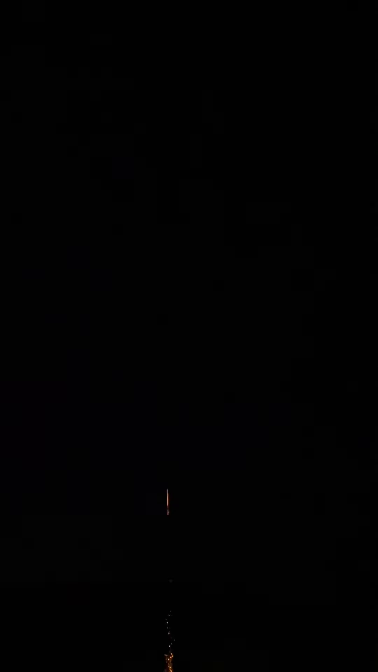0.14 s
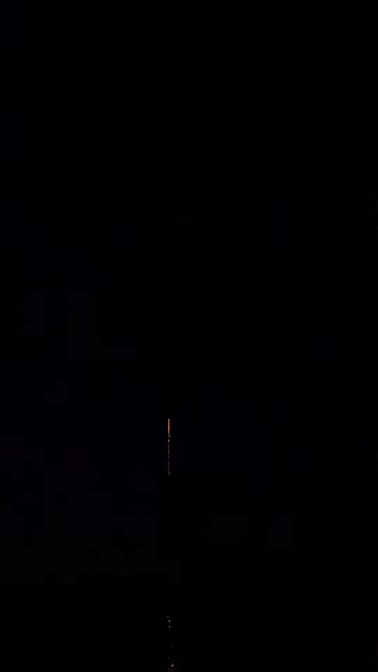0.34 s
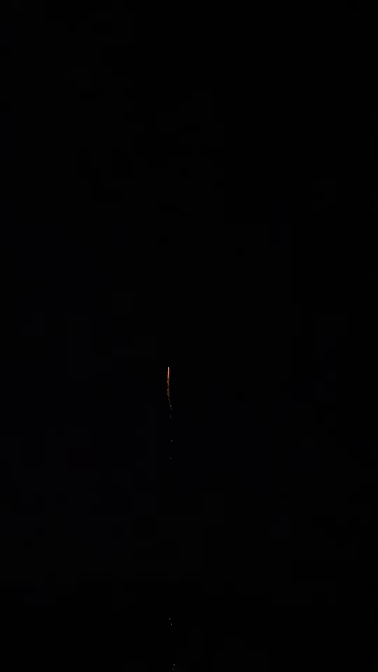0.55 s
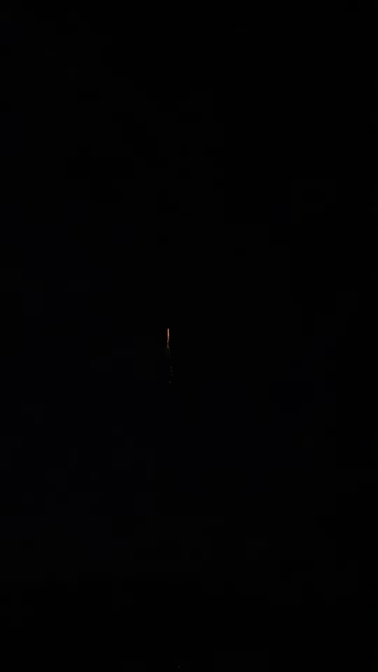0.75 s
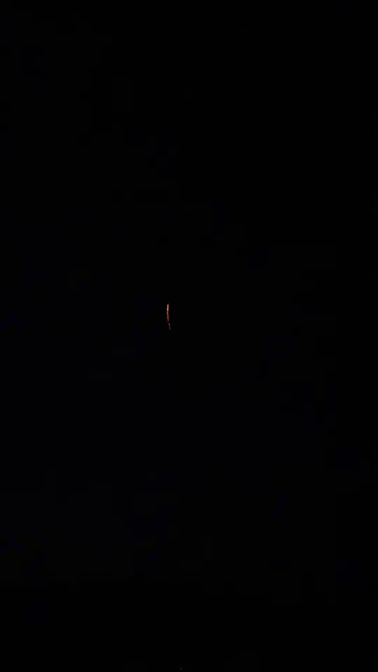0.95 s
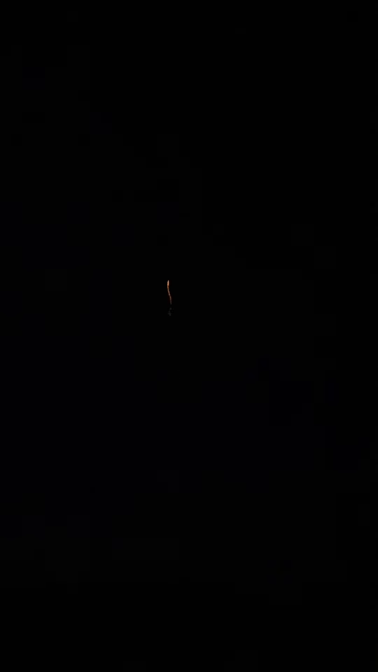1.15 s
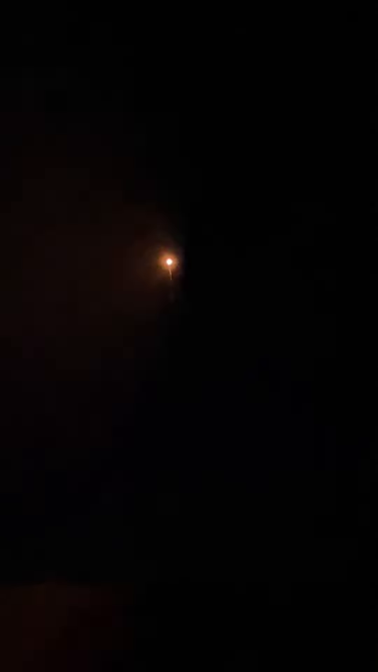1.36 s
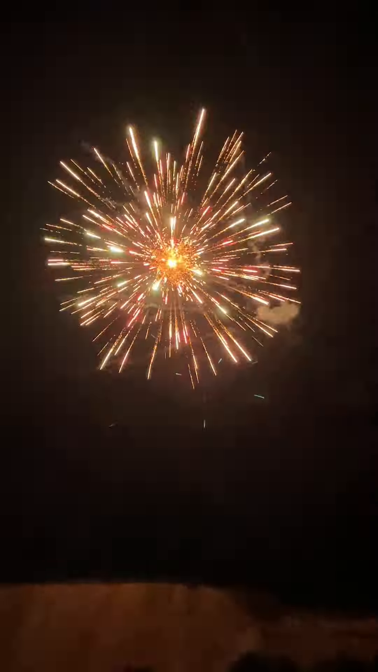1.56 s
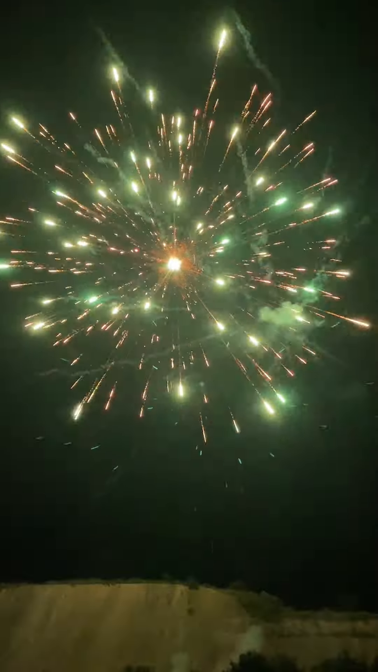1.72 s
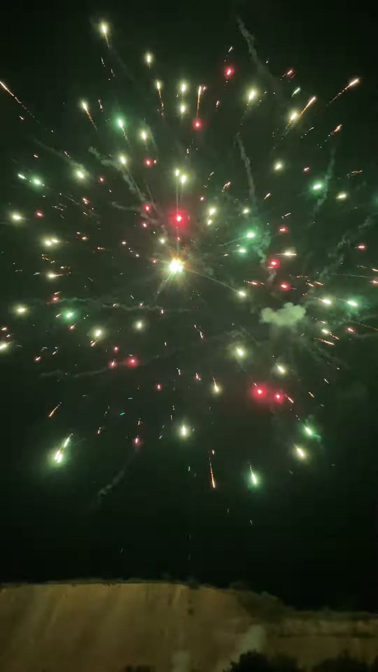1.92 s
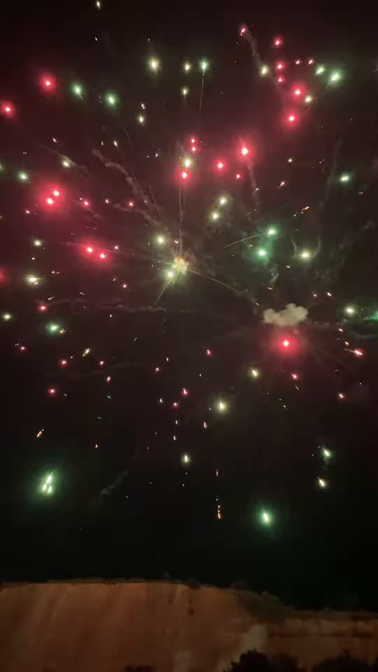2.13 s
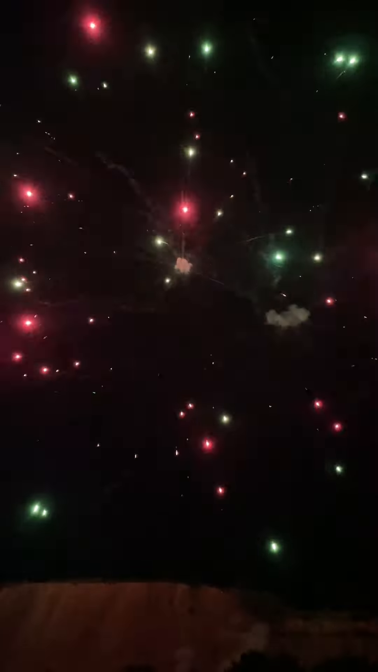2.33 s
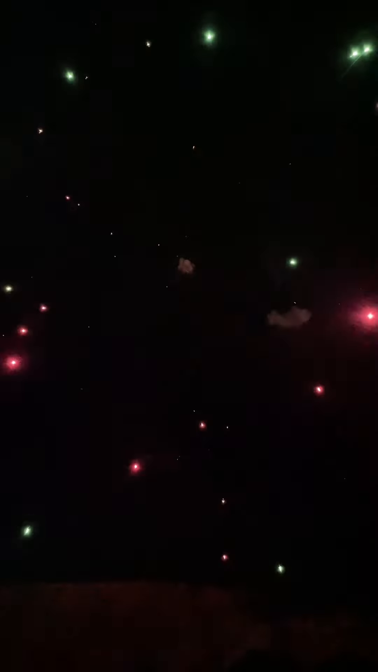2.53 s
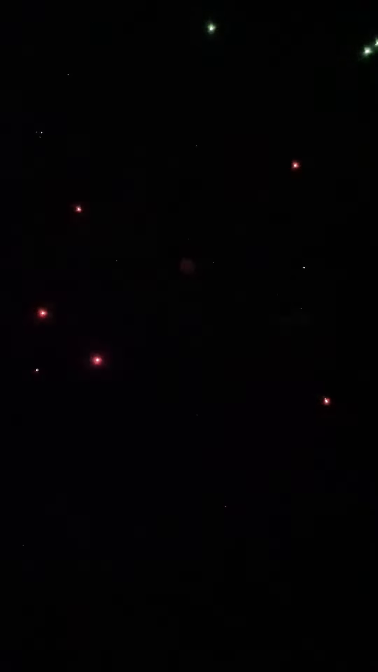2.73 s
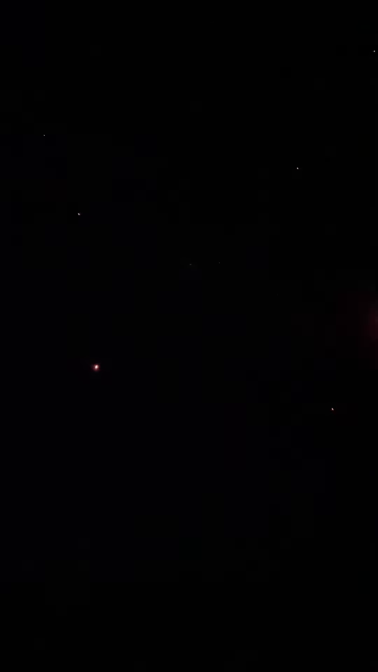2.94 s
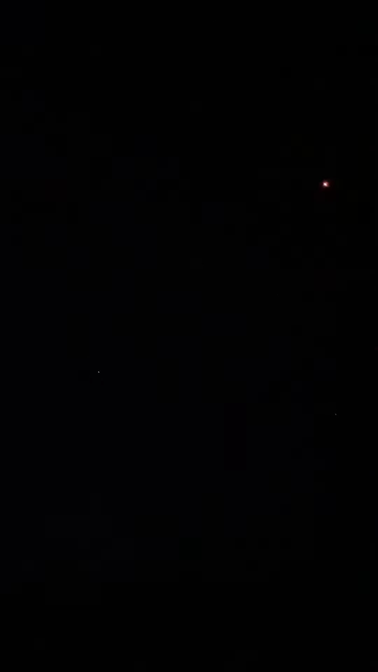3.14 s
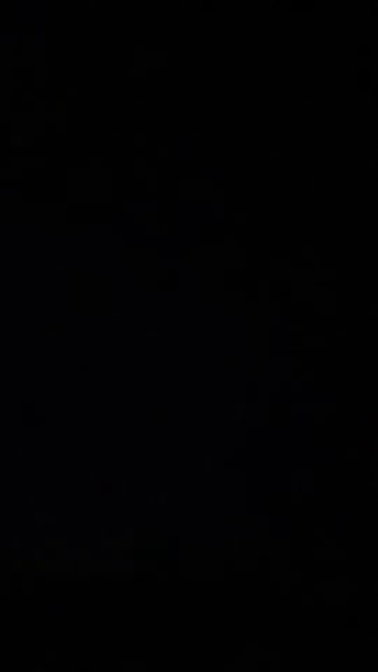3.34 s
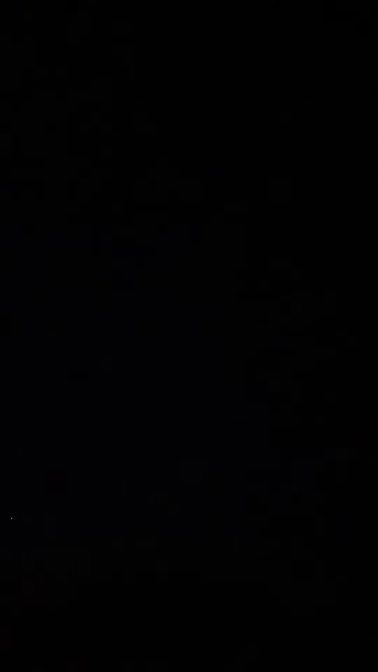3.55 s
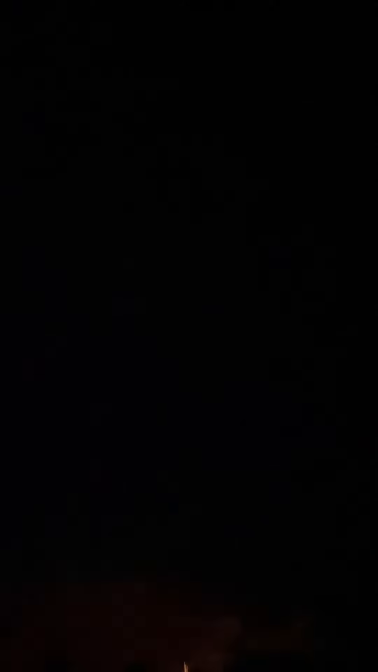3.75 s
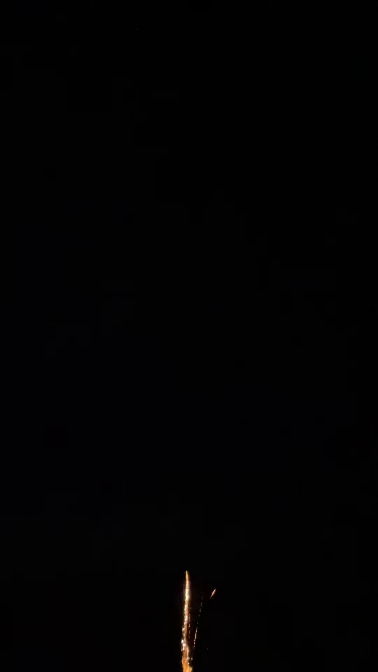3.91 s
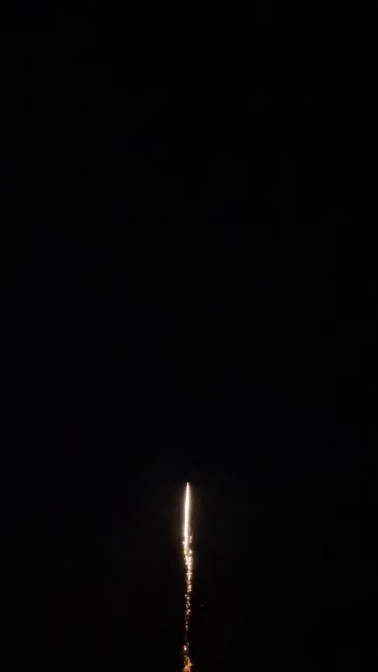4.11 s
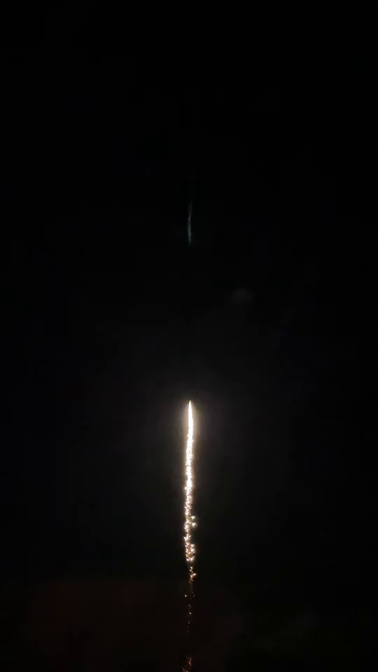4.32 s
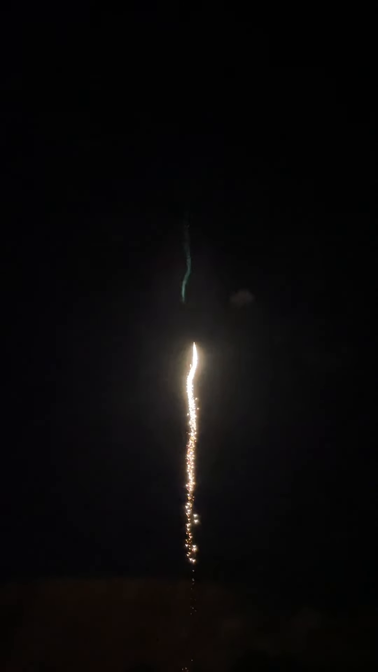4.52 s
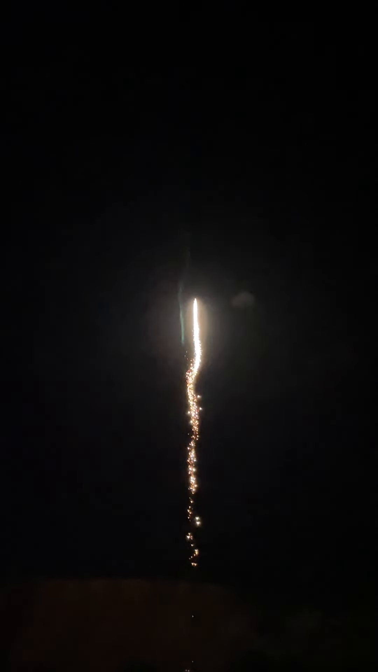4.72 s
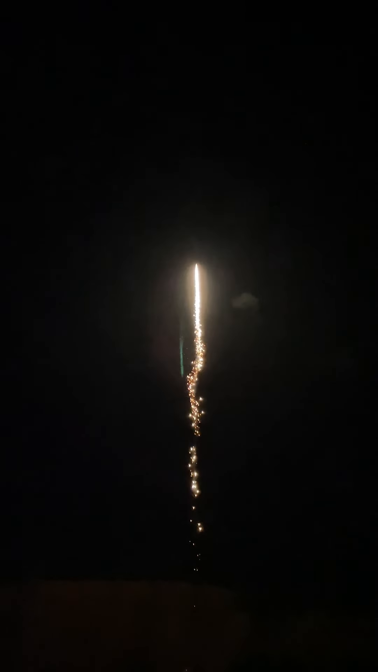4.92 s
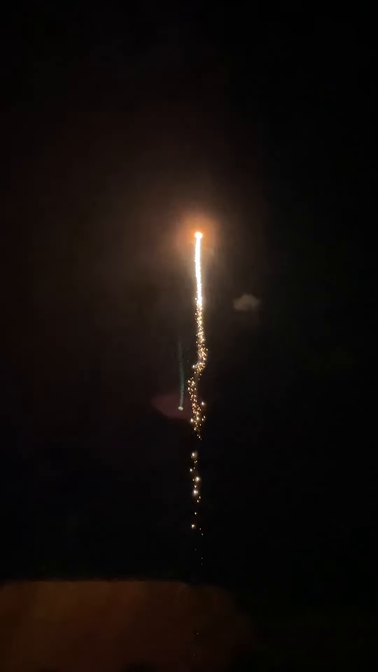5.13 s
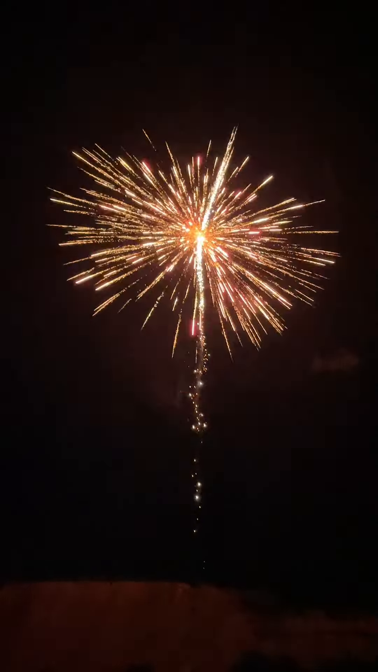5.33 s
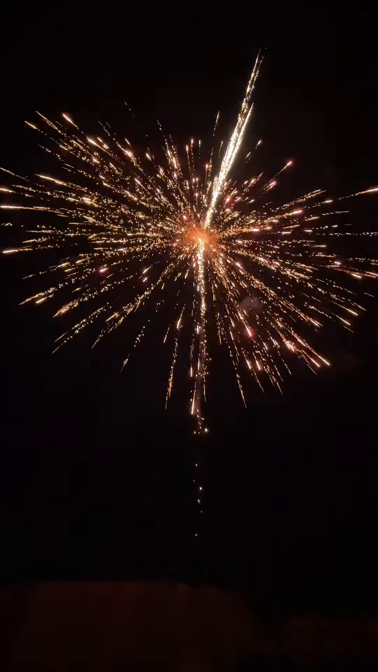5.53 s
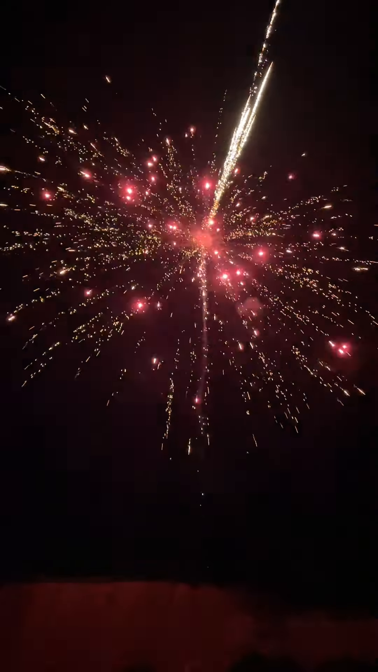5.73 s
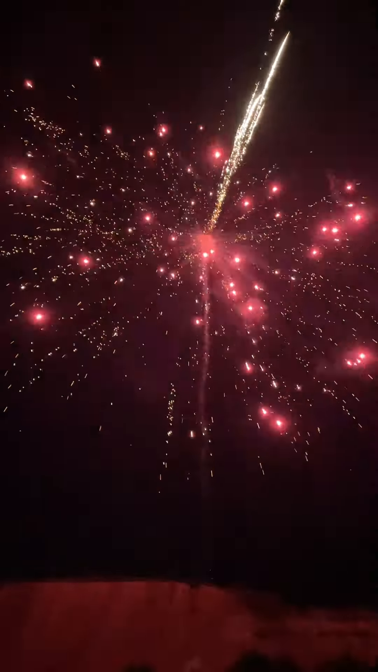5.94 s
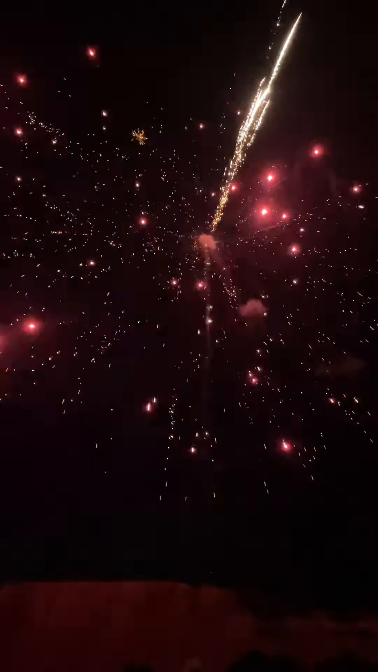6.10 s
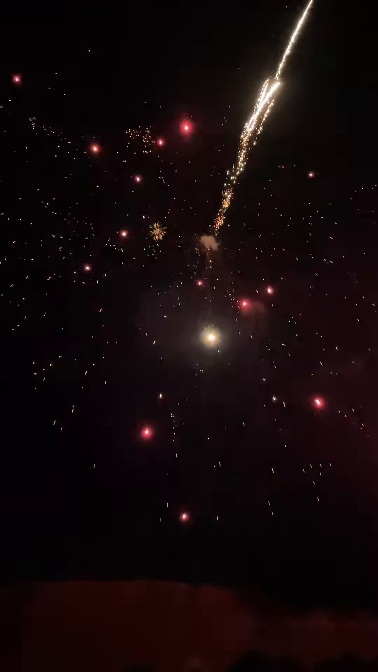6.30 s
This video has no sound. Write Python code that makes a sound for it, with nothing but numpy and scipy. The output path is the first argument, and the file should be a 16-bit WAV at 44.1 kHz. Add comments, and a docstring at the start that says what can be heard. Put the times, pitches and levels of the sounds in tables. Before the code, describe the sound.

A firework booms overhead and its echo rolls off rock slopes; another shell bangs out, hisses faintly upward and bursts with a heavy, rumbling crack.

```python
"""The roll of a launch just gone is heard first, in still night air with a faint bush cricket.
Two firework shells thud out of their tubes and burst overhead; a burning tail hisses and sings under the second.
Bangs are causal pressure pulses with noise cracks; slopes and rock faces answer with swells of shaped noise,
dull thumps and sharp claps. Small pops are noise puffs, and the microphone rounds off the loudest peaks."""
import sys
import numpy as np
from scipy import signal
from scipy.fft import rfft, irfft
from scipy.io import wavfile

SR = 44100
rng = np.random.default_rng(int(sys.argv[2]) if len(sys.argv) > 2 else 0)


def transcribe(signal):
    """Save signal, clipped to [-1, 1], as a 16-bit WAV file at the path in sys.argv[1]."""
    frames = np.atleast_2d(signal).T
    limited = np.clip(frames, -1, 1)
    pcm = np.round(limited * 32767).astype(np.int16)
    wavfile.write(sys.argv[1], SR, pcm)


N = 280740
TIME, HZ = np.arange(N) / SR, np.fft.rfftfreq(N, 1 / SR)

# launches, the first just before the start: [t/s, echo level/dB, echo treble/dB,
# snap/dB: treble of the claps off the rock, half of it also added to their level]
LAUNCHES = [(-.0972, 2.5, -0.5, 6.5), (3.9373, 1, -1.5, -2)]
# bursts overhead: [t/s, echo level/dB, echo treble/dB, crack level/dB]
BURSTS = [(1.5830, -.5, 7.5, -10.5), (5.3843, 1, 8.5, -11)]
# spectra of the two shock waves and of the crack: [f/Hz, level/dB]
LAUNCH_COLOUR = [(20, -42), (42, -10), (70, 6), (130, 3), (220, 6.5), (400, -5), (800, -16.5), (1200, -29),
                 (2300, -16), (3700, -42), (6000, -28), (9000, -37), (15000, -53)]
BURST_COLOUR = [(20, -33.5), (40, -9.5), (72, 2), (220, 0.5), (400, -7.5), (800, -20), (1100, -24.5),
                (1800, -22.5), (5000, -38), (8000, -49), (15000, -49.5)]
CRACK_COLOUR = [(40, -11.5), (150, 8), (400, 6.5), (750, 3), (1100, -0.5), (1900, -13.5), (2800, -3),
                (3800, -18), (5600, -11.5), (7500, -27), (15000, -49.5)]
LAUNCH_CRACK_DB = -20.5

# stretches of land answering every launch: [delay/s, level/dB, rise/s, fade/(dB/s), bass/dB]
LAUNCH_SWELLS = [(.02, -22.5, 0.004, 107.5, 1.5), (.19, -24, 0.068, 97.5, -12.5),
                 (.6, -44.5, 0.18, 13, -11.5), (.88, -48, 0.15, 42, -5)]
# and every burst, heard from much farther around: the same columns
BURST_SWELLS = [(.03, -37.5, 0.02, 22, 6.5), (.225, -28, 0.084, 36, 3.5), (.58, -38, 0.12, 33, 7),
                (.86, -36, 0.18, 29.4, -1), (1.16, -40, .05, 55, 0.5), (1.7, -49.5, 0.6, 4.2, -0.5)]
# spectra of the rolls: [f/Hz, level/dB]
LAUNCH_ROLL = [(18, -43), (30, -16.5), (53, 0), (195, 0.5), (520, -17), (700, -20.5), (1340, -24),
               (1750, -26.5), (2350, -22), (3000, -28), (5440, -26.5), (6880, -30), (8900, -42),
               (12200, -45), (15000, -58)]
BURST_ROLL = [(20, -36), (32, -13.5), (62, -2), (200, -1), (380, -4.5), (500, -13.5), (1100, -15),
              (2400, -23.5), (3300, -28.5), (5600, -31), (6700, -34), (8900, -42.5), (12300, -43.5),
              (15000, -58)]
BASS_HZ, TREBLE_HZ = 450, 2470  # corners of the shelves
AIR_DB_PER_KHZ_S = 1.36  # the air takes the treble from late echoes
ROLL_STOP_S = 3.68  # the roll of the first burst stops abruptly here

# spectrum of the night air: [f/Hz, level/dB]
NIGHT_COLOUR = [(20, -49.5), (45, -12.5), (120, 0), (220, -3.5), (480, -23.5), (720, -21), (1700, -33.5),
                (2450, -26.5), (3000, -30), (4300, -34.5), (4900, -22), (5400, -40), (7500, -41.5),
                (11000, -44.5), (15000, -60.5)]
NIGHT_DB = -59
# small pops and one short chirp: [t/s, level/dB, centre f/Hz, width/octaves, decay/s]
POPS = [(.015, -23, 1180, 1.1, .005), (3.450, -43.5, 1070, 1.3, .004), (4.066, -34.5, 880, 1.04, 0.012),
        (4.276, -48, 1536, 0.04, 0.014), (5.943, -29, 596, 0.64, 0.01), (6.3, -37, 5600, 0.93, 0.0016),
        (6.307, -33, 4520, 0.33, 0.0016)]

# dull echoes of the launches from near by: [t/s, level/dB]
LAUNCH_THUMPS = [(0.152, -25), (4.064, -19), (4.205, -25.5)]
# dull echoes of every burst from single slopes: [delay/s, level/dB]
BURST_THUMPS = [(.183, -14.5), (.245, -27), (0.293, -25), (0.561, -21), (.698, -22.5), (.829, -17),
                (1.07, -31), (1.709, -34.5)]
# spectrum of the dull echoes: [f/Hz, level/dB]
THUMP_COLOUR = [(25, -18), (70, -7.5), (170, 10.5), (350, 0), (600, -21), (1500, -30), (5000, -56),
                (15000, -97)]
# sharp echoes of every launch from two rock faces: [delay/s, level/dB, bass/dB]
ROCK_ECHOES = [(0.5841, -27.5, 4.5), (.845, -33.5, -23)]
# spectrum of the sharp echoes: [f/Hz, level/dB]
ROCK_COLOUR = [(25, -21), (60, 11.5), (200, -1), (400, -1), (800, 0), (1500, -8.5), (2600, -5.5),
               (4000, -11), (7000, -44), (15000, -36)]
# slaps from the cliff: [t/s, level/dB, rise/s, decay/s]
SLAPS = [(1.772, -20, 0.014, 0.015), (5.592, -19.5, 0.0066, 0.015)]
# spectrum of the slaps and of the scatter: [f/Hz, level/dB]
SLAP_COLOUR = [(60, -14), (180, 7.5), (400, -7), (700, -7.5), (1500, -6), (3000, -13.5), (5600, -14),
               (7500, -23.5), (15000, -47)]

# climb of the second shell with its burning tail: [start t/s, end t/s]
CLIMB = (4.1, 5.37)
# hiss of that tail: [f/Hz, level/dB]
TAIL_COLOUR = [(200, 4), (600, 7), (1400, 11.5), (1900, 0), (2600, 7), (3500, -0.5), (5500, -4.5),
               (7500, -16), (11000, -18), (15000, -44)]
TAIL_DB, WHISTLE_DB = -61, -66
WHISTLE_HZ, SAG_HZ_PER_S = 1880, 920

# the two microphone ports in diffuse sound: [f/Hz, left lead/rad], [f/Hz, left-right level/dB]
PORT_PHASE = [(60, -.03), (350, -.2), (1400, -.9), (2300, .6), (4000, 6.3), (7100, 9.3), (8200, 9.6),
              (13200, 15.5), (15000, 16)]
PORT_BALANCE = [(60, -.4), (200, -1.4), (450, -1.5), (750, -3), (1300, -.5), (2400, .8), (8000, 0)]
# the same for direct sound
DIRECT_PHASE = [(60, -.1), (300, -.25), (650, -1.5), (1300, -.6), (2200, 2), (4500, 6), (7000, 8.9),
                (15000, 16)]
DIRECT_BALANCE = [(60, -1), (300, -1.6), (550, -3), (780, -9), (1050, 0), (1600, -3), (2500, 3), (5000, 0)]
# diffuse sound that the ports do not share, against what they share: [f/Hz, level/dB]
UNSHARED = [(60, -26), (150, -19), (350, -9), (700, 7), (1400, -1), (3100, 14), (6400, 6), (7300, -18),
            (8000, -18), (9000, 4), (12300, 4), (13800, -16)]
CEILING, EDGE_HZ = .92, 15900  # overload amplitude and upper band limit of the microphone


def amp(db):
    """A level in decibels is twenty times the logarithm of an amplitude ratio."""
    return 10 ** (np.asarray(db) / 20)


def evened(x):
    """Division by the root mean square sets the rms to 1."""
    return x / np.sqrt(np.mean(x ** 2) + 1e-20)


def read(points, hz):
    """Linear interpolation of a table on a logarithmic frequency axis."""
    f, value = np.transpose(points)
    return np.interp(np.log(hz + 1), np.log(f), value)


def shelves(hz, bass_db, treble_db):
    """A bass shelf and a treble shelf, summed in dB."""
    bass = bass_db / (1 + (hz / BASS_HZ) ** 4)
    treble = treble_db * (1 - 1 / (1 + (hz / TREBLE_HZ) ** 4))
    return bass + treble


def add(mix, s, sound):
    """Superposition of a stereo sound at time s; what lies before zero is dropped."""
    at = round(s * SR)
    sound = sound[:, max(-at, 0):]
    part = mix[:, max(at, 0):][:, :sound.shape[1]]
    part += sound[:, :part.shape[1]]


def ports(phase, balance, hz):
    """Interaural-like phase and level differences, split evenly as complex gains of left and right."""
    half = amp(read(balance, hz) / 2) * np.exp(.5j * read(phase, hz))
    return np.array([half, 1 / half])


def diffuse(grain_db):
    """A diffuse field sums countless arrivals of uneven strength: a flat, partly coherent stereo spectrum."""
    strength = amp(grain_db * np.minimum(rng.exponential(1, N), 5))
    shared, other = rfft(evened(strength * rng.standard_normal((2, N))))
    own = amp(read(UNSHARED, HZ))
    right = (shared + own * other) / np.sqrt(1 + own ** 2)
    return np.array([shared, right]) * ports(PORT_PHASE, PORT_BALANCE, HZ)


def tinted(field, colour):
    """Linear filtering gives a flat field a spectrum; rms 1."""
    return evened(irfft(field * amp(read(colour, HZ)), N))


def shock(colour, lag_cycles, knee_hz, size=8192):
    """Dispersion: a causal pressure pulse whose bass arrives late sweeps down into a thud; peak 1."""
    hz = np.fft.rfftfreq(size, 1 / SR)
    log_gain = np.log(amp(read(colour, abs(np.fft.fftfreq(size, 1 / SR)))))
    # minimum phase is the Hilbert transform of the log gain
    causal = np.exp(np.conj(signal.hilbert(log_gain)))[:len(hz)]
    # 10 samples leave room for the earlier port
    lag_phase = lag_cycles * np.log(1 + hz / knee_hz) + 10 * hz / SR
    spectrum = causal * np.exp(-2j * np.pi * lag_phase) * ports(DIRECT_PHASE, DIRECT_BALANCE, hz)
    pulse = irfft(spectrum)[:, :size // 2]  # the thud is over by then
    return pulse / abs(pulse).max()


def bangs(rows, pulse, crack, db, bounce_s, ground_db, ground_hz, crack_s, swell_db, swell_s):
    """Direct wave and reflection: a tearing crack runs into the shock, which then bounces off the ground."""
    out = np.zeros((2, N))
    bounce = signal.lfilter(*signal.butter(1, ground_hz, fs=SR), pulse)
    dull = signal.lfilter(*signal.butter(2, 5500, fs=SR), crack)
    for s, crack_db in rows:
        add(out, s, amp(db) * pulse)
        add(out, s + bounce_s, amp(db + ground_db) * bounce)
        # seconds outside the crack, which ends at the shock
        away = np.maximum(abs(TIME - s + crack_s / 2) - crack_s / 2, 0)
        sharp_part = crack * np.exp(-away / 0.00013)
        dull_part = dull * amp(swell_db) * np.exp(-away / swell_s)
        out += amp(crack_db) * (sharp_part + dull_part)
    return out


def near_scatter(rows, sound, db, decay_s):
    """Scattering: ground and brush close by return each bang at once, decaying exponentially."""
    ages = [np.maximum(TIME - row[0], 0) for row in rows]
    return amp(db) * sound * sum((t > 0) * np.exp(-t / decay_s) for t in ages)


def patches(shape, frames, bins):
    """Interference pattern: smoothed random hills and hollows over frequency and time, rms 1."""
    i, j = np.fft.fftfreq(shape[0])[:, None], np.fft.rfftfreq(shape[1])
    smoothing = np.exp(-(i * bins) ** 2 - (j * frames) ** 2)
    return evened(np.fft.irfft2(np.fft.rfft2(rng.standard_normal(shape)) * smoothing, shape))


def roll(bang, swells, colour, grain_db, patchy_db, size=512):
    """Reverberation: each stretch of land returns a swell, and overlapping paths colour each moment."""
    s, echo_db, treble_db = bang
    overlap = 3 * size // 4
    hz, t, z = signal.stft(tinted(diffuse(grain_db), colour), SR, nperseg=size, noverlap=overlap)
    hz, age = hz[:, None], np.maximum(t - s, 0)
    power = 0
    for delay, db, rise, fade, bass_db in swells:
        growth = np.exp(np.minimum(age - delay, 0) / rise)
        decay = amp(db - fade * np.maximum(age - delay, 0))
        power = power + (growth * decay * amp(shelves(hz, bass_db, 0))) ** 2
    # the patches weaken below 500 Hz
    patchy = patchy_db * patches(z.shape[1:], frames=30, bins=3) * np.minimum(hz / 500, 1)
    air_db = AIR_DB_PER_KHZ_S * age * hz / 1000
    z = z * np.sqrt(power) * amp(echo_db + shelves(hz, 0, treble_db) + patchy - air_db)
    return (TIME > s) * signal.istft(z, SR, nperseg=size, noverlap=overlap)[1][:, :N]


def land():
    """Superposed reverberation of both launches and both bursts."""
    launches = sum(roll(bang[:3], LAUNCH_SWELLS, LAUNCH_ROLL, grain_db=3, patchy_db=2)
                   for bang in LAUNCHES)
    first, second = (roll(bang[:3], BURST_SWELLS, BURST_ROLL, grain_db=3.5, patchy_db=3.0)
                     for bang in BURSTS)
    stop = np.interp(TIME, [ROLL_STOP_S, ROLL_STOP_S + .008], [1, 0])
    return launches + first * stop + second


def night_air():
    """Stationary ambient noise: a steady diffuse field with the spectrum of the night."""
    return amp(NIGHT_DB) * tinted(diffuse(grain_db=.5), NIGHT_COLOUR)


def insects(hz=9600, width_hz=360, strokes_hz=24.6, drift=.02, db=-92):
    """Amplitude modulation: a bush cricket's narrow noise band pulses in wing strokes of drifting pace."""
    rasp = evened(irfft(diffuse(grain_db=1.0) * np.exp(-.5 * ((HZ - hz) / width_hz) ** 2), N))
    wander = evened(irfft(rfft(rng.standard_normal(N)) * np.exp(-HZ ** 2), N))
    strokes = np.cumsum(strokes_hz * (1 + drift * wander)) / SR
    return amp(db) * evened(rasp * np.sin(np.pi * strokes) ** 2)


def pops(rise_s=0.00095, size=4096):
    """Transient noise: each pop is a band-limited puff that swells and dies at once."""
    out, t, hz = np.zeros((2, N)), np.arange(size) / SR, np.fft.rfftfreq(size, 1 / SR)
    for s, db, centre, octaves, decay in POPS:
        tint = np.exp(-.5 * (np.log2((hz + 1) / centre) / octaves) ** 2)
        puff = evened(irfft(rfft(rng.standard_normal((2, size))) * tint))
        envelope = (1 - np.exp(-t / rise_s)) * np.exp(-t / decay)
        add(out, s, amp(db) * puff * envelope)
    return out


def thumps():
    """Discrete reflection: single slopes return dull, delayed pulses."""
    out, thump = np.zeros((2, N)), shock(THUMP_COLOUR, lag_cycles=0.59, knee_hz=38.7)
    of_bursts = [(s + delay, db + echo_db) for s, echo_db, *_ in BURSTS for delay, db in BURST_THUMPS]
    for s, db in LAUNCH_THUMPS + of_bursts:
        add(out, s, amp(db) * thump)
    return out


def rock_echoes(scatter, bounce_s=0.00315, bounce_db=-6, scatter_db=-19, rise_s=0.0089, decay_s=0.033):
    """Specular reflection: two rock faces return a sharp clap, with a ground bounce and a little scatter."""
    out = np.zeros((2, N))
    for s, echo_db, _, snap_db in LAUNCHES:
        for delay, db, bass_db in ROCK_ECHOES:
            colour = [(hz, level + shelves(hz, bass_db, snap_db)) for hz, level in ROCK_COLOUR]
            clap = amp(db + echo_db + snap_db / 2) * shock(colour, lag_cycles=1.04, knee_hz=44.5)
            bounce = signal.lfilter(*signal.butter(1, 1500, fs=SR), clap)
            add(out, s + delay, clap)
            add(out, s + delay + bounce_s, amp(bounce_db) * bounce)
            age = TIME - s - delay
            envelope = np.exp(-np.maximum(-age / rise_s, age / decay_s))
            out += amp(db + echo_db + scatter_db) * scatter * envelope
    return out


def cliff():
    """Rough-surface reflection: the rock face returns each burst as a tight cluster of cracks."""
    cluster = tinted(diffuse(grain_db=3.0), SLAP_COLOUR)
    return cluster * sum(amp(db) * np.exp(-np.maximum((s - TIME) / rise, (TIME - s) / decay))
                         for s, db, rise, decay in SLAPS)


def whistle(width_hz=45, rise_s=0.1, release_s=0.023):
    """Flow noise and tone: the burning tail hisses and air sings, its note sinking as the shell slows."""
    start, end = CLIMB
    flying = np.clip(np.minimum((TIME - start) / rise_s, (end - TIME) / release_s), 0, 1)
    hz = WHISTLE_HZ - SAG_HZ_PER_S * (np.clip(TIME, start, end) - start)
    # slow noise multiplies the tone and widens its line
    flutter = evened(irfft(rfft(rng.standard_normal((2, N))) * np.exp(-(HZ / width_hz) ** 2), N))
    tone = np.sqrt(2) * np.sin(2 * np.pi * np.cumsum(hz) / SR)
    hiss = tinted(diffuse(grain_db=5), TAIL_COLOUR)
    return flying * (amp(WHISTLE_DB) * flutter * tone + amp(TAIL_DB) * hiss)


def scene():
    """Linear superposition of the bangs, their echoes, the climbing shell and the night."""
    crack = tinted(diffuse(grain_db=1.5), CRACK_COLOUR)
    scatter = tinted(diffuse(grain_db=3), SLAP_COLOUR)
    lift = shock(LAUNCH_COLOUR, lag_cycles=1.11, knee_hz=41)
    blast = shock(BURST_COLOUR, lag_cycles=1.25, knee_hz=60)
    launch = bangs([(s, LAUNCH_CRACK_DB) for s, *_ in LAUNCHES], lift, crack, db=0.8,
                   bounce_s=.0056, ground_db=-28.5, ground_hz=3030,
                   crack_s=0.0037, swell_db=-10.5, swell_s=0.0036)
    burst = bangs([(s, crack_db) for s, *_, crack_db in BURSTS], blast, crack, db=0.7,
                  bounce_s=.0056, ground_db=-8.5, ground_hz=2000,
                  crack_s=.005, swell_db=-5.5, swell_s=0.0064)
    near = near_scatter(LAUNCHES, scatter, db=-16, decay_s=0.011)
    near = near + near_scatter(BURSTS, scatter, db=-23, decay_s=0.015)
    echoes = land() + thumps() + rock_echoes(scatter) + cliff()
    return launch + burst + near + echoes + night_air() + insects() + pops() + whistle()


def record(dry):
    """Saturation: the microphone rounds off the loudest peaks; a low-pass then limits the band."""
    squashed = dry / (1 + (dry / CEILING) ** 4) ** (1 / 4)
    low_pass = signal.firwin(511, EDGE_HZ, window=("kaiser", 9), fs=SR)
    return signal.oaconvolve(squashed, low_pass[None], "same")


dry = scene()
out = record(dry)
transcribe(out)
```